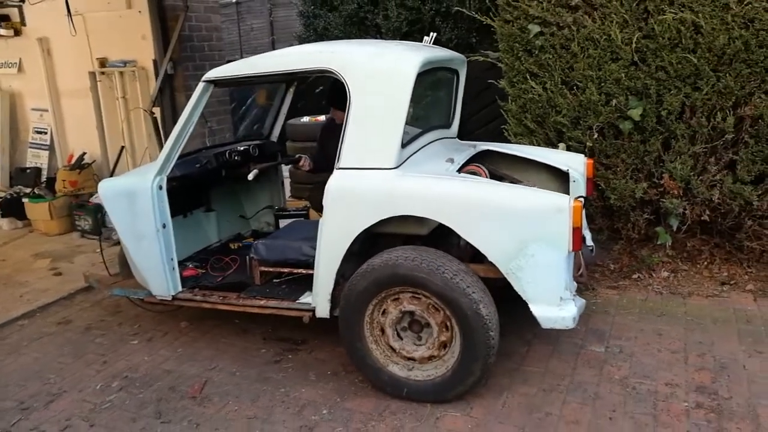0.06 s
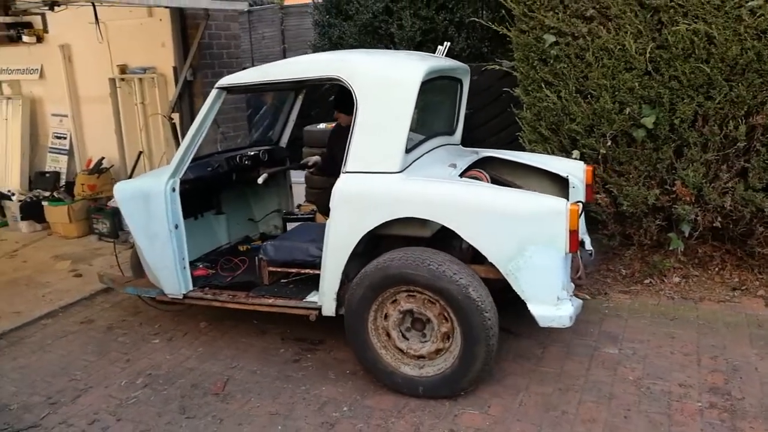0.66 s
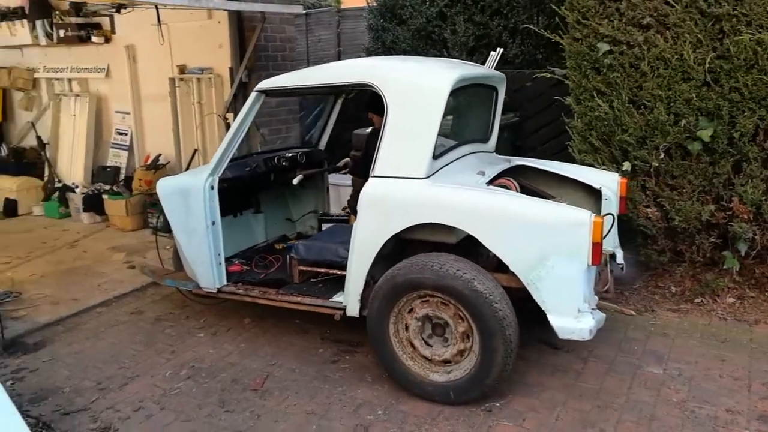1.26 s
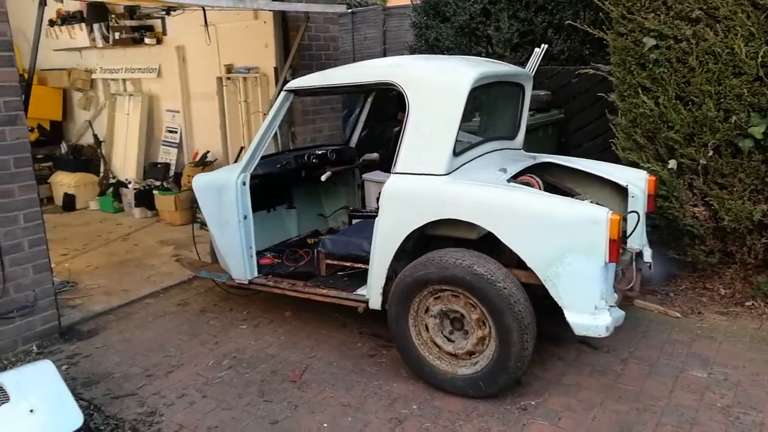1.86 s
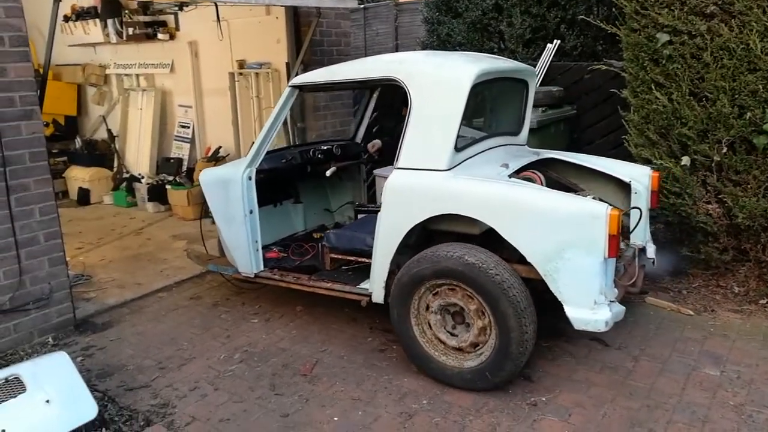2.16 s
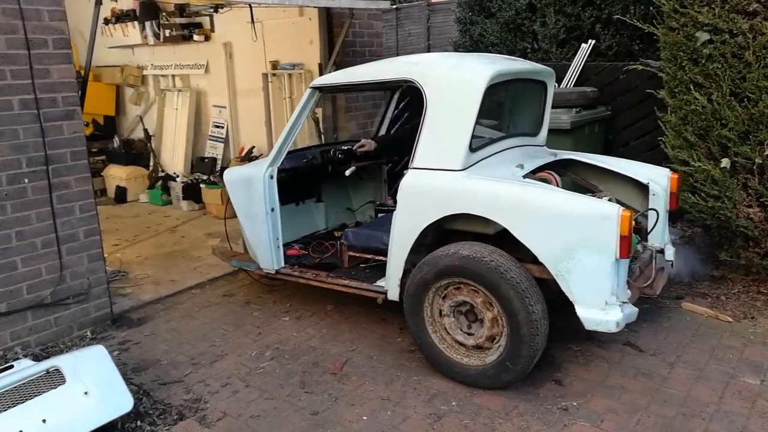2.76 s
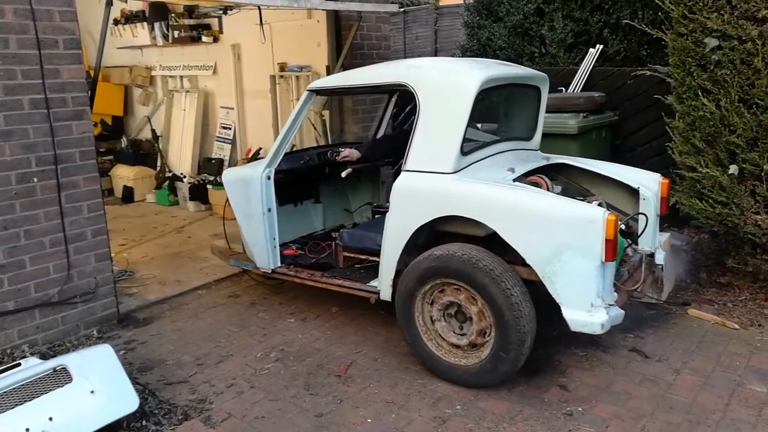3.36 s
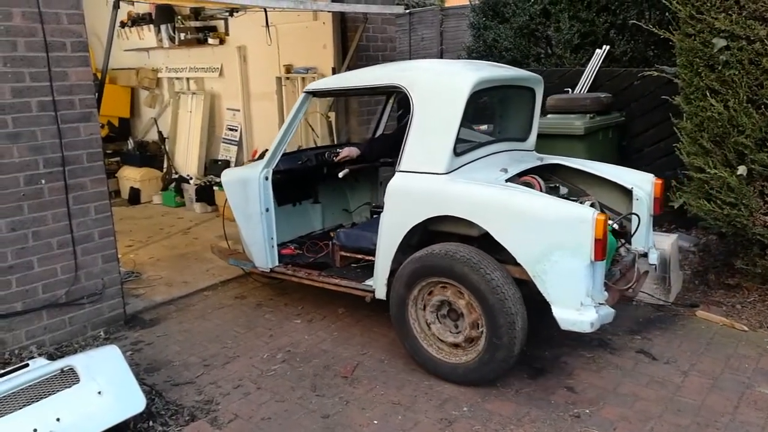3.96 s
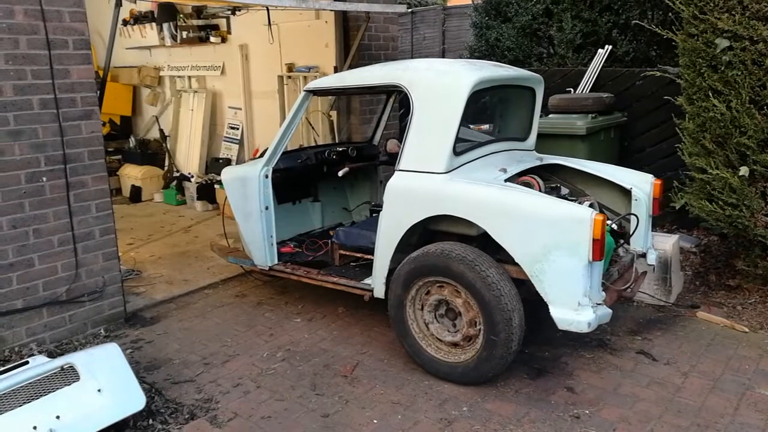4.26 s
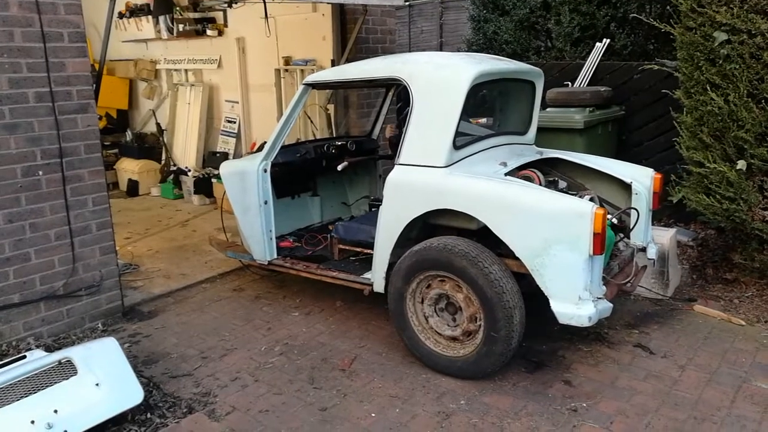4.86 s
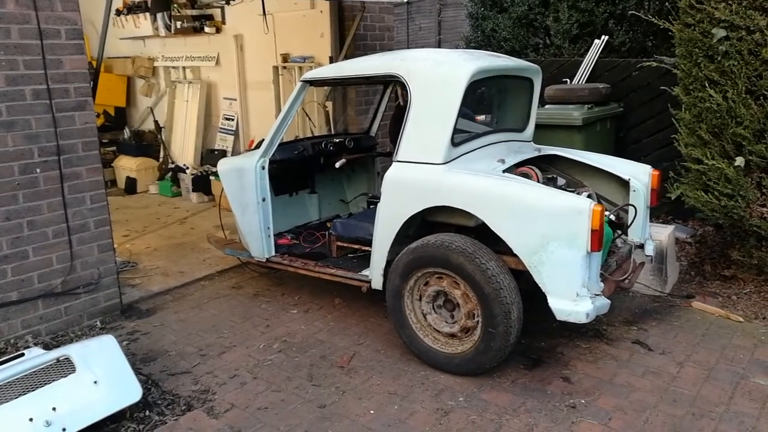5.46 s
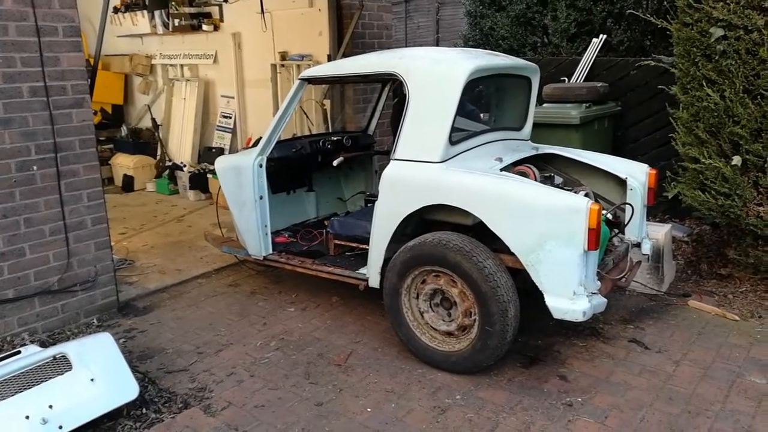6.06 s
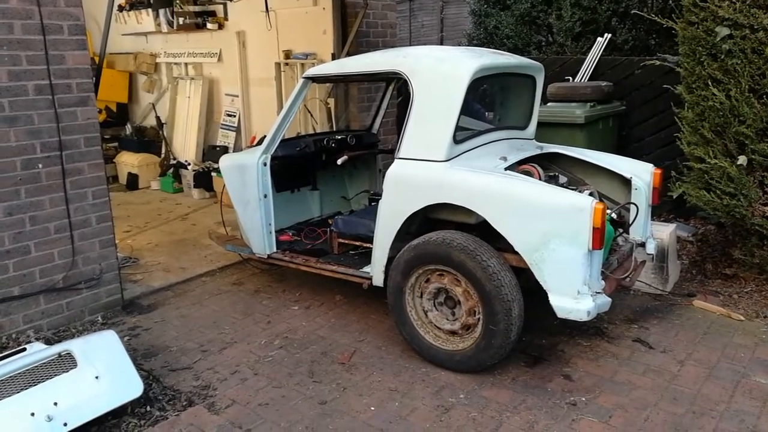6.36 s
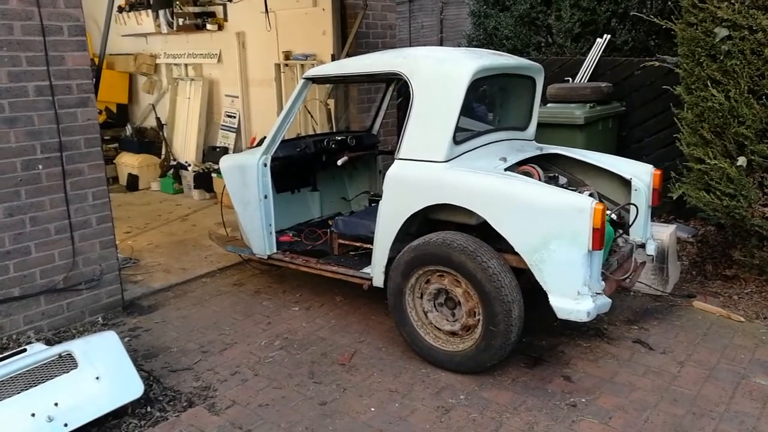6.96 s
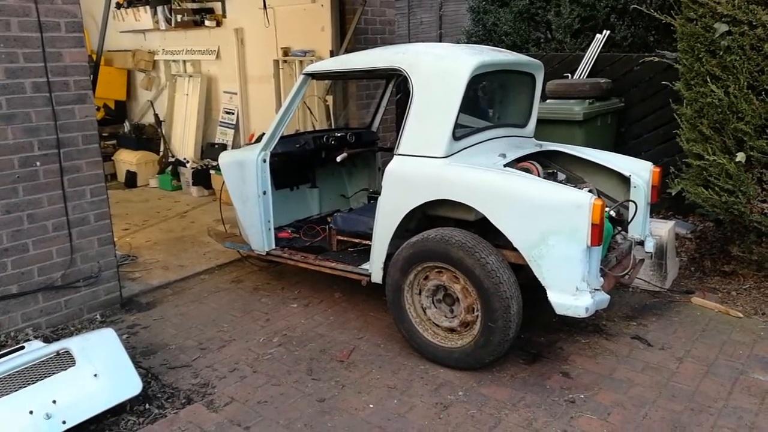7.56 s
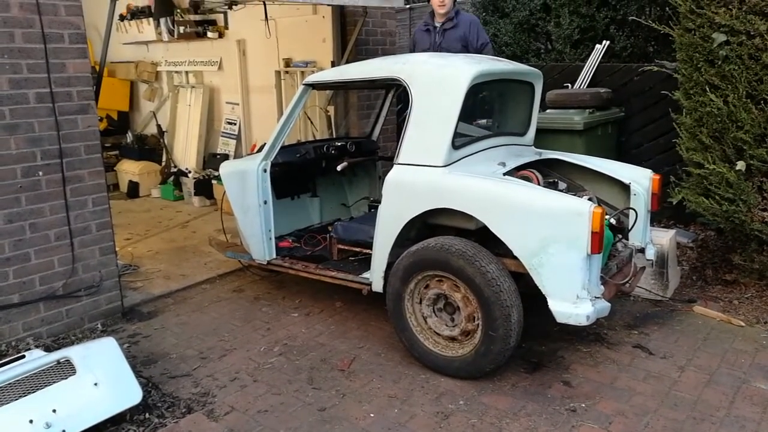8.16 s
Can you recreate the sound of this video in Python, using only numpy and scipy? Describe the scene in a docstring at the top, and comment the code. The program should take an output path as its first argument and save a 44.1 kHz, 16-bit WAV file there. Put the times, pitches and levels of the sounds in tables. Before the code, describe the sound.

A small air-cooled car engine idles fast outdoors, is switched off and chugs to a stop; later a sharp click and dull knocks follow.

```python
"""A brick drive, a stereo microphone a few metres from a stripped little car idling fast.
Its air-cooled twin gives two exhaust beats and one loose tappet snap each cycle, over the clatter
of the block and the fan's rush; the belt squeaks and a shoe scuffs. Switched off, the engine runs
down in hollow chugs and slaps, belt rubbing, and rocks back. The driver shifts and climbs out
with a click and knocks on the body shell. Distant traffic lies under it all."""
import sys
import numpy as np
from scipy import signal
from scipy.fft import rfft, irfft, next_fast_len
from scipy.io import wavfile

SR = 44100
rng = np.random.default_rng(int(sys.argv[2]) if len(sys.argv) > 2 else 0)


def to_wav(s):
    """Save 16-bit WAV."""
    ch = np.atleast_2d(s).T  # columns
    pcm = np.round(np.clip(ch, -1, 1) * 32767)  # PCM
    wavfile.write(sys.argv[1], SR, pcm.astype(np.int16))


N = 361822
TIME = np.arange(N) / SR
RING_TIME = TIME[:SR // 2]
SIDES = np.array([[1], [-1]])  # left, right
IDLE_SAMPLES = 3 * SR  # the stretch of steady idle that sets the engine's levels
KEY_OFF_S, FIRING_FADE_S = 3.6726, 0.09
UNFIRED = np.clip((TIME - KEY_OFF_S) / FIRING_FADE_S, 0, 1)  # 0 while firing, 1 after the cut


def undb(db):
    """Decibels to gain."""
    return 10 ** (np.asarray(db) / 20)


def pan(db):
    """Gains that put the left channel db above the right."""
    return undb(SIDES * db / 2)


def unit(x, end=None):
    """Scale to rms 1, judged up to sample end."""
    return x / np.sqrt(np.mean(x[..., :end] ** 2))


def curve(rows, column=1):
    """One column of a time table at every sample."""
    rows = np.asarray(rows)
    return np.interp(TIME, rows[:, 0], rows[:, column])


def read(points, hz):
    """A spectrum table on a log-frequency axis."""
    freqs, values = np.transpose(points)
    return np.interp(np.log(hz + 1), np.log(freqs), values)


def noise():
    """Two unrelated white noises."""
    return rng.standard_normal((2, N))


def wander(count):
    """A slow random drift through count points."""
    return np.interp(TIME, np.linspace(0, TIME[-1], count), rng.standard_normal(count))


def swell(start, length, rise_s, fall_s):
    """Attack, hold and release as a gain; rise and fall are the times for 60 dB."""
    outside = np.maximum((start - TIME) / rise_s, (TIME - start - length) / fall_s)
    return 1000 ** -np.maximum(outside, 0)


def strokes(rows, rise_s, fall_s):
    """The gain of a series of swells that share one attack and release."""
    return np.sqrt(sum((undb(db) * swell(s, length, rise_s, fall_s)) ** 2 for s, length, db in rows))


def impulses(times, sizes):
    """Single-sample blows at the given times."""
    samples = np.clip(np.atleast_1d(times) * SR, 0, N - 1).astype(int)
    return np.bincount(samples, np.atleast_1d(sizes), N)


def excite(pulses, response):
    """Let pulses excite a response."""
    return signal.oaconvolve(np.atleast_2d(pulses), np.atleast_2d(response), axes=1)[:, :N]


def ring(t60, yard_db=-16, yard_t60=0.42):
    """Dense modes of a struck part, then the weaker echo off walls and paving."""
    fade = np.hypot(1000 ** (-RING_TIME / t60), undb(yard_db) * 1000 ** (-RING_TIME / yard_t60))
    return rng.standard_normal((2, len(RING_TIME))) * fade


def echoed(x, db, t60):
    """A sound with its echo off walls and paving."""
    echo = ring(t60)
    return x + undb(db) * excite(x, echo / np.linalg.norm(echo[0]))


def mode(hz, width):
    """Impulse response of one resonance, gain 1 at its centre."""
    fade = np.exp(-np.pi * width * RING_TIME)
    return 2 * np.pi * width / SR * fade * np.cos(2 * np.pi * hz * RING_TIME)


def resonances(rows):
    """Impulse response of several resonances side by side."""
    return sum(undb(db) * mode(hz, width) for hz, width, db in rows)


def metal(modes, scatter_db=0):
    """The ring of struck metal; each mode reaches each side of the microphone in its own phase."""
    return sum(undb(db + scatter_db * rng.standard_normal()) * 1000 ** (-RING_TIME / t60)
               * np.sin(2 * np.pi * (hz * RING_TIME + rng.random((2, 1)))) for hz, db, t60 in modes)


def pipe(points, size=16384):
    """Minimum-phase impulse response with a given spectrum."""
    hz = np.arange(size // 2 + 1) * SR / size
    cepstrum = irfft(np.log(undb(read(points, hz))))
    fold = np.r_[1, np.full(size // 2 - 1, 2), np.zeros(size // 2)]
    return irfft(np.exp(rfft(cepstrum * fold)))


def disperse(x, hz, width):
    """A pipe section holds back the sound near one pitch without changing its level."""
    radius = np.exp(-np.pi * width / SR)
    poles = [1, -2 * radius * np.cos(2 * np.pi * hz / SR), radius ** 2]
    return signal.lfilter(poles[::-1], poles, x)


# How alike the microphone's two sides hear the yard: freq_hz, correlation (capped at 1)
YARD_LIKENESS = [(60, 1.4), (130, 0.97), (300, 0.7), (600, -0.5), (1300, 0), (2500, 0.19), (15000, 0.01)]
# The same for the engine, which stands to the right: freq_hz, correlation
ENGINE_LIKENESS = [(200, 0.95), (600, 0.87), (800, .6), (1500, 0.61), (2100, 0.21), (2900, .45),
                   (6000, 0.11), (10000, 0.07)]
# The engine's later arrival on the left: freq_hz, lag_rad
ENGINE_LAG = [(60, .15), (400, 0.76), (640, 2.4), (1000, 1.2), (1550, 0.98), (2600, 1.24), (4300, 3.5),
              (5250, 5.9), (9000, 11.9)]
# The engine's balance at the microphone: freq_hz, left_minus_right_db
ENGINE_BALANCE = [(380, 0), (600, -7.5), (900, -6.5), (1250, -4), (1750, 4.5), (2400, -5.5), (3400, -1.5),
                  (4400, 4.5), (6600, 7), (10000, -1), (15000, 0.5)]
def colour(x, points, peaks=(), at_engine=False, ripple_db=0):
    """Give two unrelated channels a spectrum and resonances; place them in the yard or at the engine."""
    size = next_fast_len(x.shape[1] + 1024)
    hz = np.arange(size // 2 + 1) * SR / size
    db = read(points, hz) + sum(lift / (1 + (2 * (hz - f) / width) ** 2) for f, width, lift in peaks)
    # countless small panel modes and near reflections ripple the treble
    grid = np.arange(0, SR / 2, 75)
    ripple = rng.standard_normal(len(grid)) * np.clip(grid / 2500, 0, 1)
    db = db + ripple_db * np.interp(hz, grid, ripple)
    mid, side = rfft(x, size)
    alike = np.clip(read(ENGINE_LIKENESS if at_engine else YARD_LIKENESS, hz), -1, 1)
    pair = (mid * np.sqrt(1 + alike) + SIDES * side * np.sqrt(1 - alike)) * undb(db)
    if at_engine:
        pair = pair * pan(read(ENGINE_BALANCE, hz)) * np.exp(-1j * SIDES * read(ENGINE_LAG, hz) / 2)
    return irfft(pair, size)[:, :x.shape[1]]


def friction(points, pressure, grain_db):
    """Rubbing: a dense run of tiny slips of uneven size."""
    slips = np.repeat(undb(grain_db * rng.standard_normal(N // 64 + 1)), 64)[:N]
    return unit(colour(noise() * slips, points)) * pressure


# The idle, hunting a little: time_s, cycle_rate_hz
IDLE_HUNT = [(.12, 12.982), (.45, 13.097), (.78, 12.818), (1.13, 12.931), (2.12, 12.674), (2.47, 12.924),
             (3.6, 12.944)]
IDLE_HZ, STOP_S, STALL_S = 12.9, 5.15, .09
DRAG_S, FRICTION_HZ_PER_S = 1.756, 3.247  # air drag alone would halve the speed in DRAG_S
def cycle_rate():
    """Cycles per second: the engine idles, coasts against drag and friction, stalls on a compression."""
    coasting_s = np.maximum(TIME - KEY_OFF_S, 0)
    hz = curve(IDLE_HUNT) / (1 + coasting_s / DRAG_S) - FRICTION_HZ_PER_S * coasting_s
    return hz * np.clip((STOP_S - TIME) / STALL_S, 0, 1)


def each_cycle(cam, share, scatter_db, jitter_ms):
    """One blow whenever the camshaft passes a share of its turn, never quite the same twice."""
    turns = np.arange(-1, 58) + share
    timing, force = rng.standard_normal((len(turns), 2)).T
    times = np.interp(turns, cam, TIME) + jitter_ms * timing / 1000
    reached = (turns > cam[0]) & (turns < cam[-1])
    return impulses(times, undb(scatter_db * force) * reached)


def tailpipe(x, lag_s=0):
    """Sound from the pipe's mouth reaches the microphone's left side a little later."""
    return np.array([np.interp(TIME - lag_s - side_s, TIME, x) for side_s in (.0004, 0)])


# The silencer's response, common to both cylinders: freq_hz, gain_db
SILENCER = [(12, -37.5), (26, -5.5), (52, -8.5), (77, -2.5), (103, 1), (155, 0.5), (180, -16), (207, -3.5),
            (232, 0), (258, -19), (285, -7.5), (335, -8.5), (360, -4.5), (410, -26), (520, -38.5),
            (1500, -68.5)]
# The part in which their two pipes differ: freq_hz, gain_db
PIPE_MISMATCH = [(70, -23.5), (120, -21.5), (142, -10), (170, -26.5), (195, -26), (219, -5), (250, -25.5),
                 (272, -21), (297, -1.5), (350, -16), (480, -27), (1500, -71)]
EXHAUST_OPENS = .19  # share of the cycle, first cylinder
def exhaust(cam):
    """Two cylinders ring the silencer in turn; unequal pipes add lines between the firing harmonics."""
    first = each_cycle(cam, EXHAUST_OPENS, scatter_db=.5, jitter_ms=.1)
    second = each_cycle(cam, EXHAUST_OPENS + .5, scatter_db=.6, jitter_ms=.12)
    beats = excite(first + second, pipe(SILENCER)) + excite(second - first, pipe(PIPE_MISMATCH))
    for hz in (226.4, 325):
        beats = disperse(beats, hz, width=68)
    return tailpipe(unit(beats, IDLE_SAMPLES)[0])


# Knocks of pistons and valve gear: cycle_share, gain_db
KNOCKS = [(.03, -0.5), (.11, -2), (.2, -3), (.33, -2.5), (.45, -0.5), (.59, -2), (.69, -2), (.83, -3),
          (.93, -3)]
# The block's clatter from a few metres: freq_hz, gain_db
BLOCK_SPECTRUM = [(60, -23.5), (230, -9), (320, -1), (400, -1.5), (490, -6), (620, 1), (830, -2.5),
                  (1800, -0.5), (2100, -7.5), (3300, -3), (8000, -9.5), (10500, -31.5), (16000, -25.5)]
# Crankcase and cowling resonances: pitch_hz, width_hz, lift_db
CASE_PEAKS = [(666, 59, 3.5), (1000, 37, 3.5), (1200, 170, 4), (1570, 490, 3), (3390, 240, 2)]
def block(cam, speed):
    """Every knock rings its own part of the engine, partly alike each cycle, partly as a loose rattle."""
    knocks = [each_cycle(cam, share, scatter_db=1, jitter_ms=.1) * undb(db) / speed ** 0.32
              for share, db in KNOCKS]
    firm = sum(excite(blows, ring(0.072, yard_db=-8)) for blows in knocks)
    rattle_t60 = .05
    rattle_power = excite(sum(knocks) ** 2, 1000 ** (-2 * RING_TIME / rattle_t60))
    rattle = noise() * np.sqrt(np.abs(rattle_power))
    clatter = unit(firm, IDLE_SAMPLES) + undb(-4) * unit(rattle, IDLE_SAMPLES)
    return unit(colour(clatter, BLOCK_SPECTRUM, CASE_PEAKS, at_engine=True, ripple_db=3.5), IDLE_SAMPLES)


# The rush of air from a few metres: freq_hz, gain_db
FAN_SPECTRUM = [(15, -20), (110, -1), (250, -1), (370, 3), (500, -7.5), (1100, -5), (1750, -4), (2200, -5),
                (5500, -3), (8000, -8), (10500, -16.5), (16000, -23.5)]
CHUG_DB, CHUG_SHARE = 6, .11  # a slowing engine pumps air in chugs: depth, peak's place in the cycle
def fan(cam, speed):
    """Cooling air and exhaust gas rush; as the engine slows they pulse more deeply and the hiss dulls."""
    throb = undb((0.06 + CHUG_DB * (1 - speed)) * np.cos(4 * np.pi * (cam - CHUG_SHARE)))
    rush = unit(colour(noise() * throb, FAN_SPECTRUM, CASE_PEAKS, at_engine=True, ripple_db=3.5))
    dull = signal.sosfilt(signal.butter(1, 1800, fs=SR, output="sos"), rush)
    return dull + speed * (rush - dull)


# Air drawn through the inlet: freq_hz, gain_db
INLET_SPECTRUM = [(150, -24.5), (220, -3), (310, 1), (400, -1), (500, -17.5), (640, 1), (720, -1),
                  (860, -18.5), (1500, -35)]
# Resonances of the inlet's hollow: pitch_hz, width_hz, gain_db
THROAT_MODES = [(365, 25, -3), (634, 21, 0), (668.6, 14, -1.5), (716, 6.7, -4.5)]
GULP_DB, GULP_SHARE = 4.5, 0.89  # depth, peak's place in the cycle
def intake(cam, speed):
    """Once a cycle the inlet valve opens and rings the inlet's hollow, and the carburettor gulps air."""
    suction = undb(GULP_DB * np.cos(2 * np.pi * (cam - GULP_SHARE)))
    gulp = colour(noise() * suction, INLET_SPECTRUM, at_engine=True)
    opening = each_cycle(cam, GULP_SHARE - .06, scatter_db=1, jitter_ms=.06)
    throat = excite(opening, resonances(THROAT_MODES)) * pan(read(ENGINE_BALANCE, THROAT_MODES[1][0]))
    return (undb(-6.5) * unit(throat, IDLE_SAMPLES) + unit(gulp, IDLE_SAMPLES)) * speed


# Tappet blows, the first four from the loose one: cycle_share, gain_db
TAPPET_BLOWS = [(-.008, -2), (.02, -7), (.07, -6.5), (.13, -10.5), (.45, -12), (.69, -8.5), (.88, -13)]
# Their bright tick at the microphone: freq_hz, gain_db
TAPPET_SPECTRUM = [(800, -24.5), (2000, -10), (3600, 2.5), (5300, 1.5), (6800, 3.5), (8500, 1.5),
                   (10500, -7), (16000, -9)]
# Modes of the loose rocker: pitch_hz, gain_db, t60_s
ROCKER_MODES = [(4652, -2.5, 0.049), (4880, -4.5, .03), (5250, -2.5, .06), (5520, -4.5, 0.03),
                (6670, -5, 0.022), (7400, -6.5, 0.025)]
# The valve gear's slow rise and fall: time_s, gain_db
TAPPET_SWELL = [(0, -3.5), (1.1, -1), (2, .5), (2.6, -1), (3.6, -1.5)]
# The loose tappet's occasional extra snaps: start_s, gain_db
SNAPS = [(1.0562, -24), (1.9918, -19.5), (2.0706, -23.5)]
def tappets(cam, speed):
    """One loose tappet snaps, rebounds and rings its rocker each cycle; the other valves tick softly."""
    ticks = 0
    for share, db in TAPPET_BLOWS:
        blows = each_cycle(cam, share, scatter_db=2, jitter_ms=.3) * undb(db) * speed ** 1.9
        ticks += excite(blows, ring(0.041, yard_db=-4.5, yard_t60=0.18))
    ticks = colour(ticks, TAPPET_SPECTRUM, at_engine=True, ripple_db=3.5)
    chime = 0
    for rocker_mode in ROCKER_MODES:  # no two blows share their force among the modes alike
        blows = sum(each_cycle(cam, share, scatter_db=2.5, jitter_ms=0.36) * undb(db)
                    for share, db in TAPPET_BLOWS[:4])
        chime += excite(blows * speed ** 2, metal([rocker_mode]))
    gear = unit(ticks, IDLE_SAMPLES) + undb(-5.5) * unit(chime * pan(2), IDLE_SAMPLES)
    snaps = excite(sum(impulses(s, undb(db)) for s, db in SNAPS), ring(.006, yard_db=-40))
    return gear * undb(curve(TAPPET_SWELL)) + colour(snaps, TAPPET_SPECTRUM, at_engine=True)


# Swells of the fan's whine: start_s, length_s, level_db
WHINE_SWELLS = [(.17, 0.27, -41), (2.03, 0.13, -45.5), (3.38, 0.58, -42)]
BLADES_PER_CYCLE = 96.6
def whine(cam, speed):
    """The fan's blades sing a rough note that sinks with the speed and breaks up once firing stops."""
    phase = 2 * np.pi * BLADES_PER_CYCLE * cam
    unsteady_rad = 1.3 + .7 * UNFIRED
    tone = [undb(2.1 * wander(300)) * np.sin(phase + unsteady_rad * wander(330)) for _ in range(2)]
    gain = np.hypot(undb(-48.5), strokes(WHINE_SWELLS, rise_s=1.3, fall_s=1.3))
    return unit(np.array(tone)) * gain * speed ** 4


# The belt drags on the last two strokes and as the engine rocks back: start_s, length_s, gain_db
BELT_RUBS = [(4.74, 0.19, -53), (5.012, 0.055, -51.5), (5.23, 0.096, -53.5)]
# The belt's hiss: freq_hz, gain_db
BELT_SPECTRUM = [(600, -7.5), (1500, -6.5), (2700, -8), (4500, -2), (7000, 0.5), (9000, -4), (11000, -15),
                 (16000, -13)]
# Resonances of its pulley: pitch_hz, width_hz, gain_db
PULLEY_MODES = [(2180, 110, -11), (3600, 81, -0.5), (4660, 130, -4), (6280, 300, 4), (10500, 200, -13),
                (13330, 160, -12)]
def belt(speed):
    """The belt hisses round its pulley, whose resonances catch, fade and linger in the yard."""
    running_gain = undb(-48)
    rubs = strokes(BELT_RUBS, rise_s=0.18, fall_s=0.19)
    drag = np.hypot(running_gain * speed, rubs)
    grip = np.hypot(running_gain * np.minimum(speed, 1 - speed / 2), rubs)
    squeal = sum(excite(noise() * undb(db + 3 * wander(260)), mode(hz, width)) / np.sqrt(width)
                 for hz, width, db in PULLEY_MODES)
    squeal = echoed(unit(squeal) * grip, db=-9.5, t60=.26)
    return undb(-3) * squeal + undb(-4) * friction(BELT_SPECTRUM, drag, grain_db=1.5)


# Rumble of the body on its springs: freq_hz, gain_db
SHUDDER_SPECTRUM = [(10, -28), (25, 0), (65, 2), (110, -0.5), (150, -10.5), (220, -22), (1500, -58)]
def shudder(speed):
    """The body trembles at idle, lurches when the firing stops and slowly settles on its springs."""
    lurch = undb(-47) * swell(KEY_OFF_S, length=0.99, rise_s=.8, fall_s=3.7)
    return unit(colour(noise(), SHUDDER_SPECTRUM)) * np.hypot(undb(-55.5) * speed, lurch)


# Distant traffic as it reaches the drive: freq_hz, gain_db
TRAFFIC_SPECTRUM = [(12, -45.5), (20, -13), (55, 2.5), (67, -10), (113, 0.5), (134, -17.5), (175, -10),
                    (422, -24.5), (1030, -18), (2670, -33), (16000, -51.5)]
# A far-off drone: pitch_hz, gain_db
DRONE_PARTIALS = [(53.8, -62.5), (107.7, -71.5), (161.5, -81.5)]
def yard():
    """Distant traffic, and a low drone that swells and wavers."""
    drone = sum(undb(db + 3 * wander(30)) * np.sin(2 * np.pi * hz * TIME + 0.8 * wander(30))
                for hz, db in DRONE_PARTIALS)
    return undb(-61.5) * unit(colour(noise(), TRAFFIC_SPECTRUM)) + undb(-1.5) * drone


# Belt squeaks, a little left of the microphone: start_s, length_s, pitch_hz, level_db
SQUEAKS = [(0.907, .04, 5600, -37), (1.218, .03, 5600, -36), (1.962, 0.032, 5800, -32),
           (2.012, .03, 5600, -35), (4.742, .025, 6140, -48), (4.87, 0.033, 6470, -47),
           (5.017, 0.023, 6300, -45), (5.05, 0.039, 5900, -57), (5.287, 0.026, 6250, -51)]
def squeaks():
    """The belt catches on its pulley in short, unsteady chirps that the yard smears."""
    wavering_time = np.cumsum(1 + .028 * wander(4000)) / SR
    chirps = 0
    for start, length, hz, db in SQUEAKS:
        arch = np.sin(np.pi * np.clip((TIME - start) / length, 0, 1))
        chirps += undb(db) * arch * np.sin(2 * np.pi * hz * wavering_time)
    return echoed(chirps * pan(4), db=-2, t60=.15)


# One scuff on the drive: start_s, length_s, level_db
SHOE_SCUFF = [(2.175, 0.089, -26)]
# Sole on brick: freq_hz, gain_db
SCUFF_SPECTRUM = [(900, -34.5), (2200, -2), (3300, -5), (4500, 3), (6000, -8.5), (8200, -1.5),
                  (10000, -11.5), (12500, -7.5), (16000, -14.5)]
def shoe():
    """A shoe rubs briefly over the paving."""
    return friction(SCUFF_SPECTRUM, strokes(SHOE_SCUFF, rise_s=.2, fall_s=0.25), grain_db=1)


# Modes of the tin cowling: pitch_hz, width_hz, gain_db
COWLING_MODES = [(720, 75, -4), (1030, 35, -2.5), (1183, 55, 0.5), (1480, 40, -5.5), (1594, 29, -6.5)]
def cowling(cam, speed):
    """As the speed drops the tin cowling starts to ring, shaken by every stroke."""
    shake = noise() * undb(CHUG_DB * np.cos(4 * np.pi * (cam - CHUG_SHARE)))
    return (1 - speed) * unit(excite(shake, resonances(COWLING_MODES)), IDLE_SAMPLES)


# The silencer's response to an unfired suck of air: freq_hz, gain_db
PUFF_SPECTRUM = [(15, -26), (60, -4.5), (85, -8), (104, 4), (125, 0), (155, -13.5), (195, -3), (240, -14),
                 (285, -3), (340, -15.5), (1500, -59)]
def puffs(cam, speed):
    """Unfired, each cylinder sucks air back through the silencer: hollow chugs, weaker as it slows."""
    sucks = sum(each_cycle(cam, EXHAUST_OPENS + half, scatter_db=1.2, jitter_ms=.3) for half in (0, .5))
    response = pipe(PUFF_SPECTRUM)
    chugs = excite(sucks * speed ** 1.25, response / response.max())[0]
    return undb(-26.5) * UNFIRED * tailpipe(chugs, lag_s=.0056)


SLAP_SPEED, SLAP_WIDTH = 0.58, 0.09  # shares of idle speed: hardest slap, offset for 1 dB less
def slaps(cam, speed):
    """Unfired, the engine slaps through its slack at each compression of the last slow turns."""
    force = undb(-26.5 - ((speed - SLAP_SPEED) / SLAP_WIDTH) ** 2) * (TIME > KEY_OFF_S)
    first, second = (each_cycle(cam, share, scatter_db=.7, jitter_ms=.2) * force for share in (.008, .51))
    first += impulses(5.171, undb(-52))  # the crank drops back off compression
    hard = excite(first, ring(0.082, yard_db=-32))
    soft = undb(-10) * excite(second, ring(0.038, yard_db=-31.5))
    return colour(hard + soft, BELT_SPECTRUM, CASE_PEAKS, at_engine=True)


# The driver's movements, faint at this distance: start_s, length_s, level_db
SEAT_SHIFTS = [(5.635, .025, -72), (5.72, 0.51, -78.5), (6.555, .015, -78), (7.01, .14, -74),
               (7.56, .55, -79.5), (8.185, 0.032, -56.5)]
# Rubbing cloth: freq_hz, gain_db
RUSTLE_SPECTRUM = [(1000, -14), (2200, -12), (3400, 0), (6500, -1.5), (10000, -9), (16000, -19)]
def clothes():
    """Clothes rustle as the driver shifts in the seat."""
    return friction(RUSTLE_SPECTRUM, strokes(SEAT_SHIFTS, rise_s=0.2, fall_s=0.18), grain_db=2)


# The catch's click at the microphone: freq_hz, gain_db
CLICK_SPECTRUM = [(400, -45), (1200, -6), (2300, -15), (2900, 1), (3300, -7), (4000, 2), (5500, -3.5),
                  (7000, 4), (9000, 1.5), (11500, -6.5), (16000, -19)]
# Modes of the steel catch: pitch_hz, gain_db, t60_s
CATCH_MODES = [(1825, -9, 0.23), (2900, -10, 0.11), (3800, -3, 0.12), (4861, -3, .11), (8253, 3, .095),
               (9100, -6, 0.1), (10300, -2, 0.091)]
def steel_catch():
    """A steel catch snaps with a sharp crack and rings."""
    crack = excite(impulses(7.9603, undb(10)), ring(.005, yard_db=-60))
    strike = impulses(7.9605, 1)
    tail = excite(strike, ring(0.15, yard_db=-17, yard_t60=0.54))
    click = undb(-30.5) * pan(2.2) * colour(crack + tail, CLICK_SPECTRUM)
    return click + undb(-43.9) * excite(strike, metal(CATCH_MODES))


# Blows on the body shell: start_s, knock_gain_db, t60_s, boom_gain_db
BODY_BLOWS = [(8.059, -45.5, 0.15, -58), (8.073, -45, 0.16, -56), (8.1, -35, 0.071, -43),
              (8.107, -36.5, 0.12, -34), (8.148, -57.5, .1, -32), (8.185, -55.5, 0.18, -36)]
# A struck panel: freq_hz, gain_db
PANEL_SPECTRUM = [(80, -29), (230, -1.5), (500, -11), (800, -2), (1200, -1.5), (1800, -1), (2500, -10),
                  (3500, -5), (4600, -11), (5600, -19), (16000, -44.5)]
# Modes of the car's frame: pitch_hz, gain_db, t60_s
FRAME_MODES = [(773, -8.5, 0.2), (906, -8, .2), (1130, 1, .14), (1503, 1.5, 0.12), (1750, -8, 0.16),
               (2880, -2, 0.1)]
# Low ring of the shell: pitch_hz, width_hz, gain_db
SHELL_MODES = [(211, 11, 1.5), (274, 8.6, -2), (356, 16, -5), (443, 12, -4)]
def body_knocks():
    """As the driver climbs out, dull blows land on the panels; the frame clangs and the shell booms."""
    knocks = sum(excite(impulses(s, undb(db)), ring(t60, yard_db=-18)) for s, db, t60, _ in BODY_BLOWS)
    clang = sum(excite(impulses(s, undb(db)), metal(FRAME_MODES, scatter_db=3))
                for s, db, _, _ in BODY_BLOWS)
    boom = excite(sum(impulses(s, undb(db)) for s, _, _, db in BODY_BLOWS), resonances(SHELL_MODES))
    panels = colour(knocks, PANEL_SPECTRUM, ripple_db=3)
    return undb(8) * panels + undb(-10.5) * clang + undb(35.5) * boom


# The idle as the microphone moves round to the back: time_s, exhaust_gain_db, machinery_gain_db
WALK_ROUND = [(0, -32, -37.5), (1.4, -32.5, -38.5), (2.2, -32, -38.5), (3.6, -33.5, -38)]
FIRST_TAP_S, UNFIRED_DROP_DB = .052, 1
def scene():
    """The camshaft's angle times the engine's beats; its speed sets how hard the parts strike."""
    hz = cycle_rate()
    cam = np.cumsum(hz) / SR - hz[0] * FIRST_TAP_S  # in turns
    speed = np.clip(hz / IDLE_HZ, .001, 1)
    exhaust_gain = undb(curve(WALK_ROUND, column=1) - 0.9) * (1 - UNFIRED)
    machinery_gain = undb(curve(WALK_ROUND, column=2) - UNFIRED_DROP_DB * UNFIRED) * speed ** 1.37
    machinery = undb(5) * block(cam, speed) + undb(4.5) * fan(cam, speed)
    machinery += undb(-2) * intake(cam, speed) + undb(3.5) * cowling(cam, speed)
    engine = exhaust_gain * exhaust(cam) + puffs(cam, speed) + machinery_gain * machinery
    engine += whine(cam, speed) + undb(-35.5) * tappets(cam, speed)
    engine += belt(speed) + squeaks() + slaps(cam, speed)
    return engine + shudder(speed) + shoe() + clothes() + steel_catch() + body_knocks() + yard()


TOP_HZ = 15850
def record(dry):
    """The recorder behind the microphone cuts the top steeply."""
    return signal.sosfilt(signal.ellip(10, .2, 70, TOP_HZ, fs=SR, output="sos"), dry)


dry = scene()
out = record(dry)
to_wav(out)
```